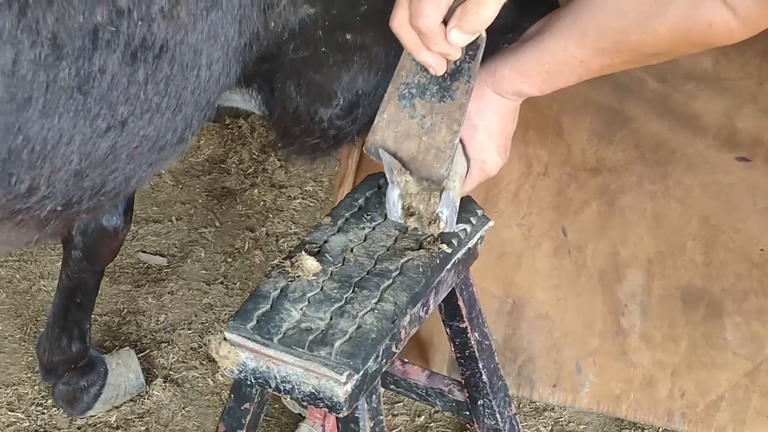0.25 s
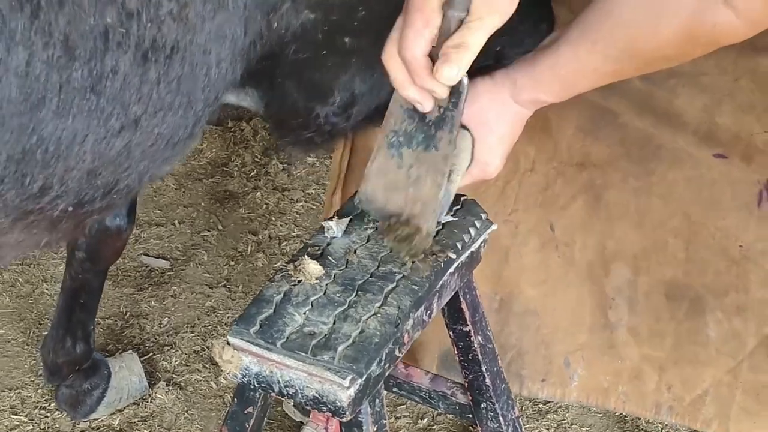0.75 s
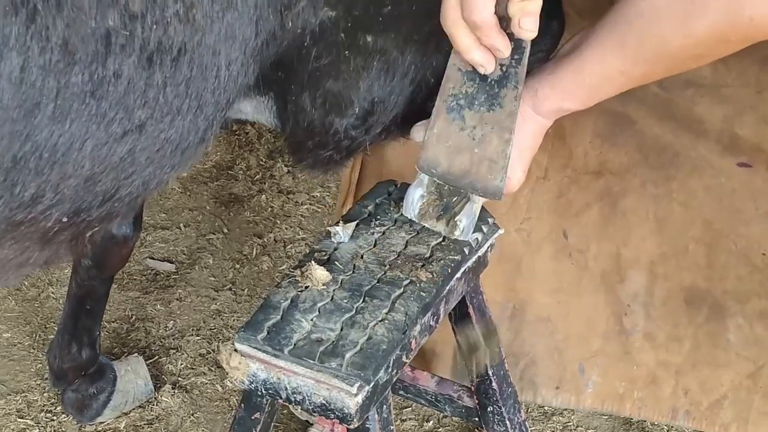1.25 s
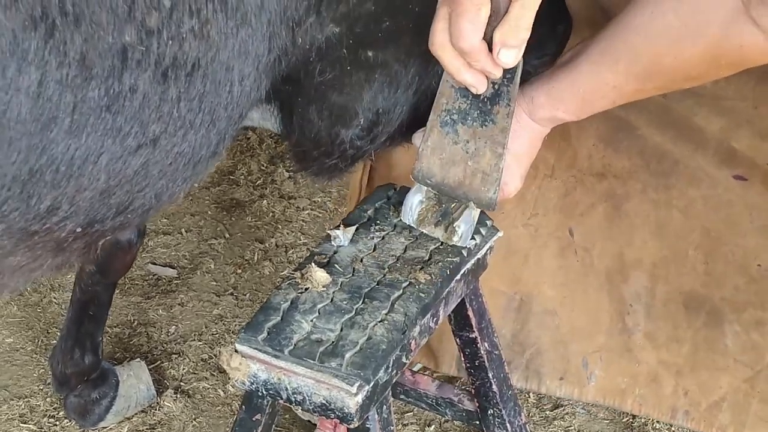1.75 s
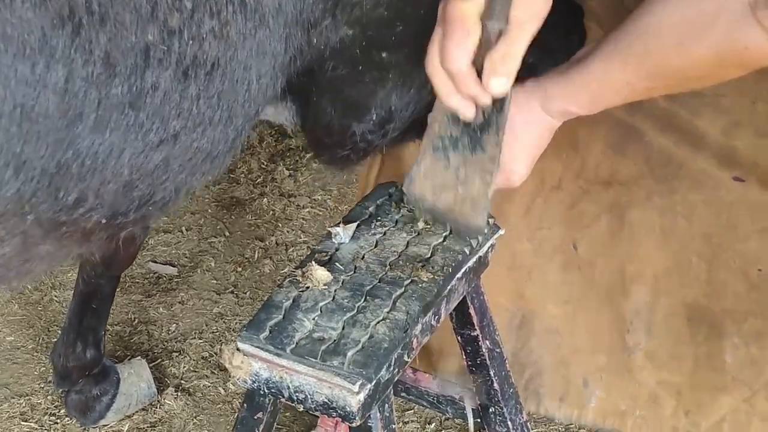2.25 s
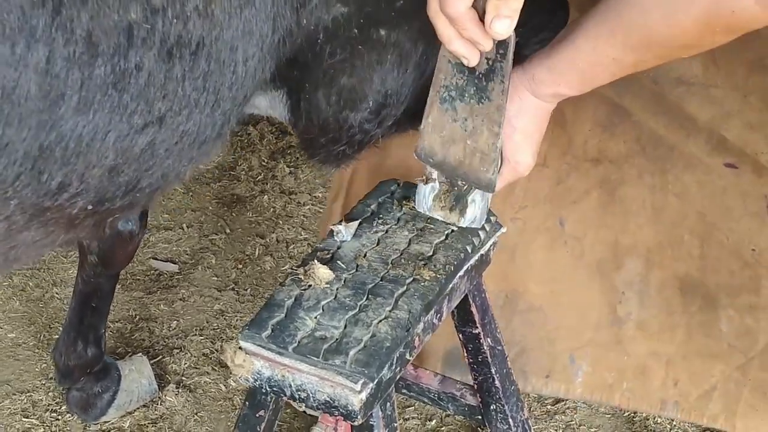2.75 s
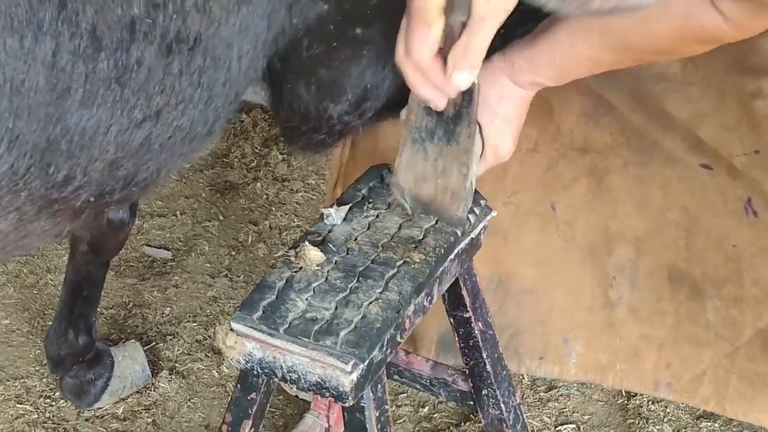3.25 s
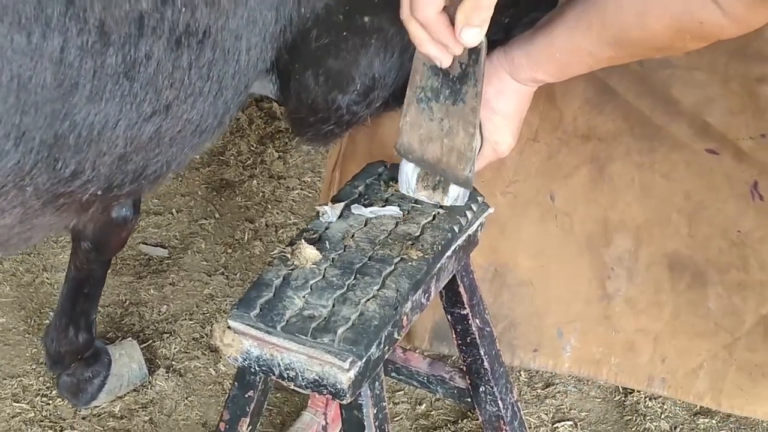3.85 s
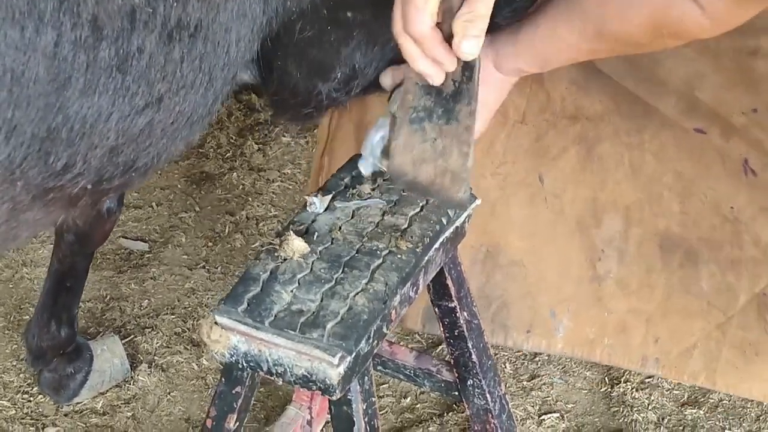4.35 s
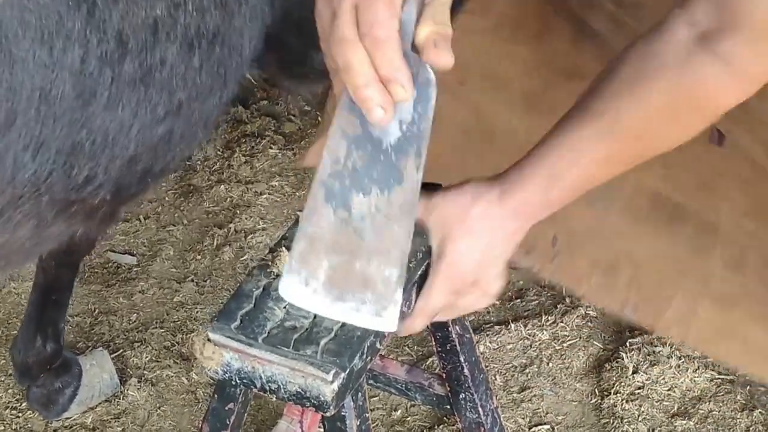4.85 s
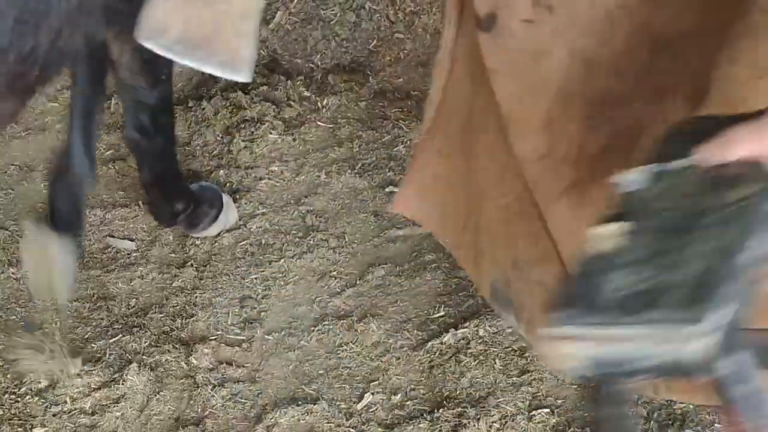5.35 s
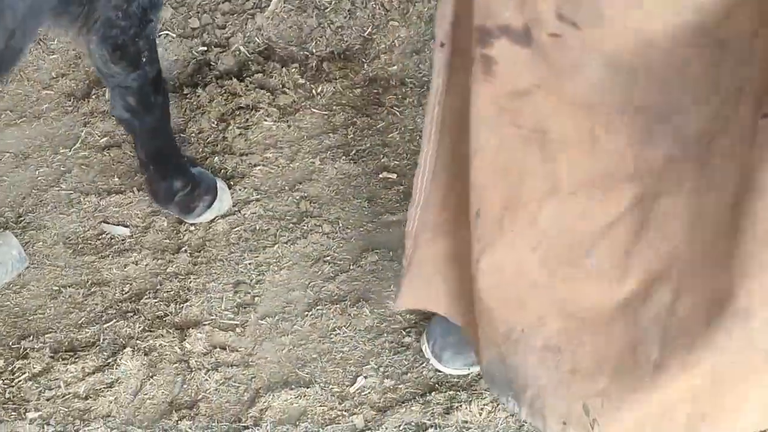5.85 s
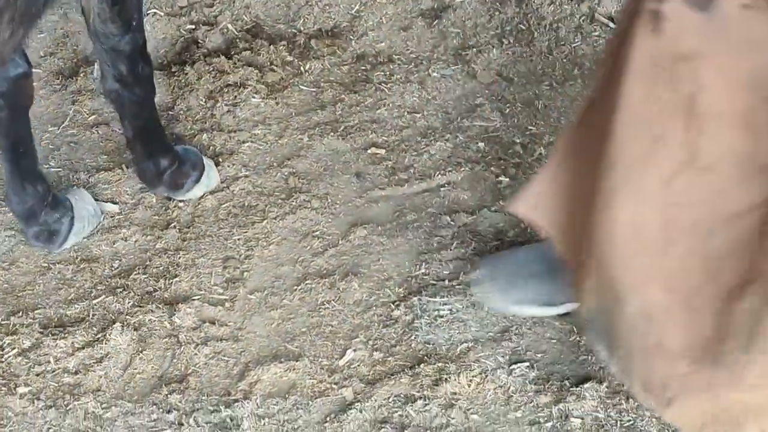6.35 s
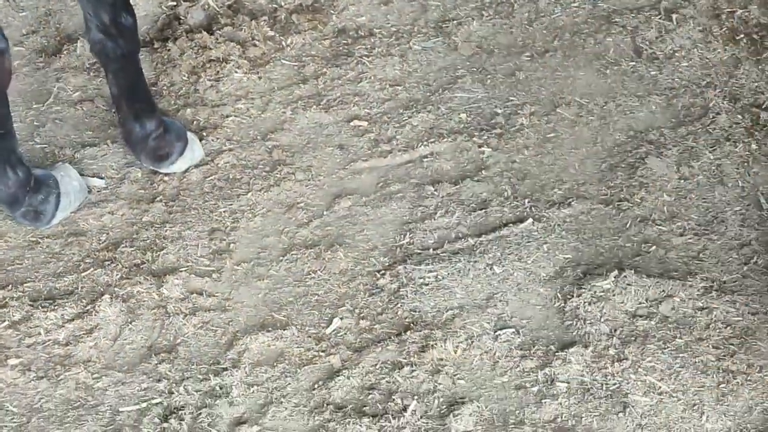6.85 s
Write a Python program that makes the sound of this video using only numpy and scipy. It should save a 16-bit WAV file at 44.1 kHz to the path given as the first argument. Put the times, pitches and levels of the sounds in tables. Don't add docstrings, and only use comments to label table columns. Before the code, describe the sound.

Two donkeys bray a few metres from a handheld phone outdoors. The tail of a deep haw gives way to soft hiss and dry paring strokes of steel on hoof. Snorty wheezes lead into strong hee-haw calls, the second hee much higher, overlapped by a low moan and a climbing snort before a long buzzing haw. Faint squeaks, wind thumps and a far motor hum lie beneath.

```python
import sys
import numpy as np
from scipy import signal
from scipy.fft import rfft, irfft, next_fast_len
from scipy.io import wavfile
from scipy.ndimage import uniform_filter1d, minimum_filter1d

SR = 44100
rng = np.random.default_rng(int(sys.argv[2]) if len(sys.argv) > 2 else 0)


def ratio_of_db(decibels):
    return 10 ** (np.asarray(decibels, float) / 20)


def unload_audio(sound):
    columns = np.transpose(np.atleast_2d(sound))
    steps = np.round(np.clip(columns, -1, 1) * 32767)
    wavfile.write(sys.argv[1], SR, steps.astype(np.int16))


N = 313572
TIME = np.arange(N) / SR


def unit(x):
    return x / np.sqrt(np.mean(x ** 2))


def curve(table):
    s, *columns = np.transpose(table)
    return [np.interp(TIME, s, c) for c in columns]


def on_log(hz, points):
    f, v = np.transpose(points)
    return np.interp(np.log(np.maximum(hz, 1)), np.log(np.maximum(f, 1)), v)


def shaped(gain_of_hz, x):
    size = next_fast_len(N)
    hz = np.fft.rfftfreq(size, 1 / SR) + 1e-3
    return irfft(rfft(x, size) * gain_of_hz(hz), size)[..., :N]


def resonances(modes):
    def gain(f):
        power = 0
        for hz, width_hz, db in modes:
            detune = (f - hz * hz / f) / (3.06 * width_hz)
            power = power + ratio_of_db(2 * db) / (1 + detune ** 2) ** 2
        return np.sqrt(power)
    return gain


def walk(rate, size=N):
    k = int(SR / rate)
    steps = np.repeat(rng.standard_normal(size // k + 1), k)
    return 1.87 * uniform_filter1d(uniform_filter1d(steps, k), k)[:size]


def pair(like):
    mid, side = rng.standard_normal((2, N))
    like = np.clip(like, 0, 1)
    return np.sqrt(1 + like) * mid + np.sqrt(1 - like) * side * np.array([[1], [-1]])


def panned(db):
    return ratio_of_db(np.array([[db], [-db]]) / 2)


def arrival(s, length, rise, fall_db_per_s):
    return np.clip((TIME - s) / rise, 0, 1) * ratio_of_db(-fall_db_per_s * np.clip(TIME - s - length, 0, None))


# f/Hz, level/dB per Hz
YARD = [(150, -3), (300, 0), (600, -9), (2200, -8), (2900, -17), (4000, -16.5), (5000, -10), (6200, -11.5),
        (7600, -10.5), (8600, -16.5), (9500, -31), (15000, -44)]


def yard_hiss():
    hiss = unit(shaped(lambda f: ratio_of_db(on_log(f, YARD)) * (f > 100), pair(0.33)))
    return hiss * ratio_of_db(-59.5 + 1.3 * walk(2))


# t/s, level/dB
MOTOR = [
    (0, -80.5),
    (3.5, -57.5),
    (5.9, -51),
    (6.2, -57.5),
    (7.11, -71.5),
]


def far_motor():
    motor_hz = 52
    level_db = curve(MOTOR)[0] + 1.0 * walk(5.2)
    return np.sqrt(2) * ratio_of_db(level_db) * np.sin(2 * np.pi * motor_hz * TIME)


# t/s, peak level/dB, length/s
GUSTS = [
    (0.018, -39, 0.22),
    (0.712, -43, 0.015),
    (1.067, -49, 0.06),
    (1.352, -48, 0.03),
    (1.885, -46.5, .25),
    (2.501, -29, 0.017),
    (2.571, -36, 0.11),
    (5.641, -46.5, 0.058),
    (7.024, -46, 0.087),
]


def wind():
    lull_db, rumble_db, rumble_growth, rumble_lull_db = -57, 1.5, 1.217, -63
    gust = sum(ratio_of_db(2 * db) * np.exp(-2 * np.abs(TIME - s) / length) for s, db, length in GUSTS)
    buffet_level_db = 10 * np.log10(gust + ratio_of_db(2 * lull_db))
    rumble_power = ratio_of_db(2 * rumble_db) * gust ** rumble_growth + ratio_of_db(2 * rumble_lull_db)
    rumble_level_db = 10 * np.log10(rumble_power)
    buffet = unit(shaped(resonances([(30.3, 17, 0)]), pair(0.23)))
    buffet = buffet * ratio_of_db(buffet_level_db + 2.0 * walk(9.3))
    rumble = unit(shaped(resonances([(64.7, 43, -1), (144, 360, -9.5)]), pair(0.71)))
    rumble = rumble * ratio_of_db(rumble_level_db + 3.5 * walk(40))
    rumble = shaped(lambda f: 1 / np.sqrt(1 + (f / 330) ** 5), rumble)
    return (buffet + rumble) * panned(-3.5)


def walls(x):
    near_t60_s, far_t60_s = .4, 1.3
    wall_db, far_wall_db = -8, -27
    fading = ratio_of_db(-60 * TIME / near_t60_s) + ratio_of_db(far_wall_db - 60 * TIME / far_t60_s)
    tail = rng.standard_normal((2, N)) * fading * (TIME > .012)
    tail = tail[:, :SR] / np.sqrt(np.sum(tail[0] ** 2))
    thin = shaped(lambda f: f / np.hypot(f, 500), x.mean(axis=0))
    return ratio_of_db(wall_db) * signal.fftconvolve(thin[None], tail, axes=1)[:, :N]


# t/s, f/Hz, peak level/dB, rise/s, fade/s
PINGS = [(.589, 1220, -34, .004, .005), (.589, 2150, -35, .003, .006), (3.22, 850, -21, .02, .03),
         (3.42, 850, -19, .04, .04), (0.764, 1175, -34.5, 0.0066, 0.014), (.775, 1250, -44, 0.011, 0.02),
         (0.769, 2350, -41, 0.015, 0.016), (.772, 3428, -47, 0.011, 0.008), (1.0, 5500, -53, 0.0054, 0.011),
         (1.7, 2250, -60, .03, .04), (1.555, 2260, -61, 0.0072, 0.0144), (1.765, 970, -57, 0.012, 0.013),
         (2.253, 5400, -56.5, 0.0015, .04), (2.252, 7540, -48, 0.0013, .02), (4.275, 4400, -55, .008, .012),
         (4.265, 5450, -58, .006, .012), (4.325, 5400, -58, .006, .01), (5.44, 5450, -58, .005, .01),
         (4.08, 960, -20, .03, 0.04), (5.585, 3780, -49, .035, 0.056), (7.04, 3690, -51, 0.058, 0.05)]


def pings():
    glide_per_s = .4
    out, flutter = np.zeros(N), ratio_of_db(3.5 * walk(140))
    for s, hz, db, rise, fade in PINGS:
        into = np.clip(TIME - s, 0, .3)
        shape = np.clip(into / rise, 0, 1) * np.exp(-np.clip(into - rise, 0, None) / fade)
        shape = shape * (into < .3)
        climb = 1 + glide_per_s * rise * into / 0.12
        out += ratio_of_db(db) * shape * np.sin(2 * np.pi * hz * into * climb)
    return out * flutter * panned(-0.45)


# f/Hz, level/dB per Hz
BLADE = [(600, -13), (1200, -7.5), (2200, -2), (2900, -16.5), (4000, -22), (5000, -14.5), (6200, -18.5),
         (7600, -16.5), (8600, -19), (9500, -30), (12000, -22), (15000, -21)]
# t/s, length/s, level/dB, brightness/dB, left minus right/dB
SCRAPES = [(-.02, .19, -43.5, 4.5, -1), (0.021, 0.092, -46.5, 4.5, -1.5), (0.575, 0.004, -44.5, -1.5, 5),
           (0.59, 0.014, -39.5, -8.5, -0.5), (0.62, 0.004, -49.5, 7, -11), (0.628, 0.012, -48.5, -8, -0.5),
           (1.303, .05, -62.5, -10, -1), (1.718, .06, -61, -9, 0), (1.876, 0.086, -50.5, 4, -7),
           (1.984, 0.02, -48.5, 3, -13.5), (2.423, .03, -50.5, 1, -8), (4.043, 0.063, -53, 4, -5.5),
           (4.102, 0.008, -32, 0.5, -5.5), (4.243, 0.056, -50, -2.5, -8), (5.384, 0.03, -63, 8, -2.5)]


def scrapes():
    grit, bright_hz = 0.28, 3300
    hiss = unit(shaped(lambda f: ratio_of_db(on_log(f, BLADE)) * (f > 500), pair(0.28)))
    bright = shaped(lambda f: f > bright_hz, hiss)
    grain = 1 - grit + grit * rng.exponential(size=N // 64 + 1).repeat(64)[:N]
    out = np.zeros((2, N))
    for s, length, db, bright_db, pan_db in SCRAPES:
        into = TIME - s
        fade = np.exp(-np.clip(into - length, 0, None) / (0.0045 + .12 * length))
        stroke = np.clip(into / (0.11 * length), 0, 1) * fade
        out += ratio_of_db(db) * panned(pan_db) * stroke * grain * (hiss + (ratio_of_db(bright_db) - 1) * bright)
    return out


# t/s, length/s, level/dB, from f/Hz, to f/Hz, width/Hz
SNORT = (5.53, .28, -38, 2250, 2650, 1000)


def snort():
    s, length, db, from_hz, to_hz, width_hz = SNORT
    hz = np.interp(TIME, [s, s + length], [from_hz, to_hz])
    air = np.array([walk(width_hz), walk(width_hz)]) * np.sin(2 * np.pi * np.cumsum(hz) / SR)
    return ratio_of_db(db) * air * arrival(s, length, length / 2, fall_db_per_s=297)


# f/Hz, width/Hz, level/dB
SNORE_TRACT = [(376, 25.6, -4.5), (850, 37, 1), (1120, 26, 0), (1640, 16, -15), (2150, 120, -27.5),
               (3194, 40, -31.5), (710, 210, -15)]
# t/s, length/s, level/dB
SNORES = [
    (1.822, 0.15, -36.5),
    (2.069, .03, -44.5),
    (2.147, 0.05, -41),
    (2.224, 0.056, -41.5),
    (2.339, 0.036, -38),
    (2.371, 0.036, -32.5),
    (2.41, 0.041, -32),
    (2.487, 0.12, -35.5),
    (2.597, 0.032, -35.5),
    (2.66, 0.13, -31.5),
]


def snores():
    air = unit(shaped(resonances(SNORE_TRACT), ratio_of_db(2.8 * walk(60)) * pair(0.95)))
    power = sum(ratio_of_db(2 * db) * arrival(s, length, .003, 501) ** 2 for s, length, db in SNORES)
    return air * np.sqrt(power)


# f/Hz, width/Hz, level/dB
CHEST = [(385, 70, 0), (480, 300, -14)]
THROAT = [(862, 73, 0), (1103, 92, -4.5), (845, 420, -9)]
MOUTH = [(1635, 35, 2), (1780, 5500, -6.5)]
NOSTRIL = [(3200, 290, 1), (4980, 750, -5.5), (7570, 260, 3), (10500, 710, -17.5)]


def breath_jets(sung):
    jet = np.abs(shaped(lambda f: f > 900, sung)) * pair(0.23)
    return ratio_of_db(-30.0) * shaped(resonances(NOSTRIL), jet)


# lowest f/Hz, highest f/Hz
MUZZLE_HZ = (162, 2222)
# t/s, length/s, effort level/dB, chest depth/dB, mouth opening/dB
TURNS = [(-.03, 0.19, -21.5, -5.5, -8.5), (0.179, 0.13, -29.5, -10.5, -10.5), (1.818, .15, -50.5, -15, -12),
         (2.366, 0.4, -45.5, -1.5, -15), (2.735, 0.04, -32.5, 4, -13), (3.17, 0.043, -29, -8.5, -6.5),
         (3.207, 0.079, -21.5, -10.5, -10.5), (3.434, 0.088, -27.5, -5.5, -5),
         (3.543, 0.18, -27, -11, -5.5), (4.11, 0.36, -48, 3.5, -7.5), (5.513, 0.086, -42, -4, -1),
         (5.585, 0.1, -29, -15.5, -3), (5.684, 0.13, -26.5, -16.5, -8.5),
         (5.751, 0.064, -22.5, -0.5, -17.5), (5.831, .08, -38.5, -2, -1.5), (5.917, 0.1, -33, 0, 2),
         (5.986, 0.079, -14.5, -9.5, -15.5), (6.951, 0.07, -25.5, -28, -5.5), (7.071, .1, -34.5, -15, 1.5)]


def rasp(sung):
    rise_s, fall_db_per_s = 0.024, 297
    nostril_db, nostril_opening = -23.5, 0.052
    leak_db = (-35.5, -23, -25, -43)
    leak_growth, smooth = 0.74, int(0.047 * SR)
    pulsing, pulse_top_hz = .6, 450
    flap_db, out = 0.88 * walk(130), 0
    tone = shaped(lambda f: f < pulse_top_hz, sung[0])
    tone_size = np.sqrt(2 * np.abs(uniform_filter1d(tone ** 2, smooth)) + 1e-5)
    puffs = 1 + pulsing * tone / tone_size
    voice = np.abs(uniform_filter1d(shaped(lambda f: f > 800, sung[0]) ** 2, smooth)) ** leak_growth
    power = ratio_of_db(2 * np.array(leak_db))[:, None] * voice
    for s, length, db, depth_db, open_db in TURNS:
        share_db = db + np.array([depth_db, 0, open_db, nostril_db + nostril_opening * open_db])
        power = power + ratio_of_db(2 * share_db)[:, None] * arrival(s, length, rise_s, fall_db_per_s) ** 2
    low_hz, high_hz = MUZZLE_HZ
    muzzle = lambda f: 1 / np.sqrt((1 + (low_hz / f) ** 8) * (1 + (f / high_hz) ** 16))
    for modes, p, like in zip((CHEST, THROAT, MOUTH, NOSTRIL), power, (0.99, 0.62, 0.14, 0.19)):
        air = shaped(resonances(modes), ratio_of_db(flap_db + 1.5 * walk(40)) * pair(like))
        if modes is not NOSTRIL:
            air = shaped(muzzle, air)
        out = out + unit(air) * np.sqrt(p) * (1 if modes is CHEST else puffs)
    return out


# from t/s, to t/s, cycles per beat, depth/0-1
GROWLS = [
    (0, 0.28, 3, 0.18),
    (2.719, 2.795, 2, 0.43),
    (3.184, 3.308, 2, 0.18),
    (3.389, 3.496, 2, 0.1),
    (3.558, 3.764, 3, 0.19),
    (6.45, 6.9, 2, .05),
    (4.723, 5.422, 2, 0.02),
    (5.708, 5.844, 2, 0.3),
    (6.03, 6.23, 2, 0.1),
    (6.985, 7.108, 2, 0.2),
]


def growl(phase, span):
    gain = np.ones_like(phase)
    for start, end, cycles, depth in GROWLS:
        inside = np.clip(np.minimum(TIME[span] - start, end - TIME[span]) / 0.023, 0, 1)
        beat = np.exp(1.45 * np.cos(phase / round(cycles))) / 2.46
        gain *= 1 + depth * inside * (beat - 1)
    return gain


# t/s, loss level/dB, half length/s
CATCHES = [
    (2.212, 16.5, .015),
    (2.359, 9, .012),
    (2.413, 10, .012),
    (4.739, 8.5, .014),
    (4.782, 4, .012),
    (4.83, 2.5, .015),
    (4.873, 6, .02),
    (4.94, 4, .012),
    (5.352, 2.5, .04),
    (7.052, 16.5, 0.011),
]


def catch_db(span):
    return sum(db * np.clip(1 - np.abs(TIME[span] - s) / half, 0, 1) for s, db, half in CATCHES)


# from t/s, to t/s, f/Hz, width/Hz, level/dB
TONGUE = [(6.04, 6.26, 1600, 110, 13), (5.99, 6.22, 2100, 130, -17), (6.0, 6.24, 1050, 160, -9.5),
          (5.95, 6.33, 750, 76, -11), (5.99, 6.24, 5100, 770, -16.5), (6.0, 6.24, 3200, 570, -6.5),
          (6.25, 6.8, 5030, 430, -10.5), (5.9, 6.04, 1180, 150, -8), (8, 6.95, 4700, 120, 6),
          (6.42, 6.84, 3360, 79.7, 3), (6.3, 6.8, 1540, 60, -4), (6.845, 6.865, 1850, 100, -10),
          (6.85, 7.0, 810, 60, 6), (6.04, 6.3, 600, 25, 7), (6.5, 7, 5900, 600, -15),
          (4.79, 4.83, 1100, 100, -14), (4.88, 4.91, 1400, 500, -14), (4.94, 5.04, 1150, 100, -9),
          (5.145, 5.19, 1150, 100, -15), (5.25, 5.29, 1150, 100, -9), (5.3, 5.35, 1150, 100, 5.5),
          (4.92, 5.06, 1720, 100, 3.5), (5.18, 5.3, 1720, 100, 5.5), (5.42, 5.52, 1900, 640, -16.5),
          (4.7, 5.19, 5100, 250, -4), (0.28, 0.39, 860, 80, 8.5), (2.7, 2.78, 1800, 650, -11),
          (3.04, 3.25, 710, 60, -12), (3.13, 3.25, 1900, 160, -9), (3.27, 3.42, 1700, 190, 4.5),
          (3.44, 3.52, 1700, 360, -8), (3.5, 3.42, 5600, 440, 0.5), (3.55, 3.75, 1300, 600, 4.5),
          (4.48, 4.66, 1020, 100, 6.5), (3.7, 5, 2200, 200, 7), (5.4, 5.5, 1200, 74, 10.5),
          (3.2, 3.95, 3600, 170, 5)]


def tongue_db(hz, span):
    glide_s = 0.042
    t, total = TIME[span], 0
    for start, end, centre_hz, width_hz, db in TONGUE:
        in_time = start < t[-1] and end > t[0]
        in_reach = hz.min() - 3 * width_hz < centre_hz < hz.max() + 3 * width_hz
        if in_time and in_reach:
            inside = np.clip(np.minimum(t - start, end - t) / glide_s + .5, 0, 1)
            total = total + db * inside * np.exp(-((hz - centre_hz) / width_hz) ** 2)
    return total


def halo(hz):
    per_khz, rate = .1, 170
    flutter = np.array([walk(rate, size=len(hz)) for _ in range(2)])
    return 1 + per_khz * hz.mean() / 1000 * flutter


def scatter(hz):
    scatter_rad, full_hz = .45, 1300
    return scatter_rad * min(hz.mean() / full_hz, 1) ** 2 * rng.uniform(-1.2, 1, (2, 1))


def note(table, partials_db, sinuses, left_lag_ms, sinus_db, unsteady):
    upper_top_hz, upper_lag = 6325, .6
    pan_db, pan_db_per_ms = -1.36, 5.5
    start, end = table[0][0], table[-1][0]
    span = slice(int(start * SR), min(int(end * SR), N))
    hz, effort_db, open_db = (c[span] for c in curve(table))
    size = len(hz)
    caught_db = catch_db(span)
    wobble = unsteady * (0.69 * walk(120, size=size) + 2 * walk(30, size=size))
    phase = 2 * np.pi * np.cumsum(hz) / SR + wobble
    lag = np.pi * hz * left_lag_ms / 1000 * np.array([[-1], [1]])
    phase, upper_phase = phase + lag, phase + upper_lag * lag
    since_start = TIME[span] - start + .02 * (span.start == 0)
    edge = np.clip(np.minimum(since_start, end - TIME[span]) / 0.015, 0, 1)
    chest, mouth = partials_db
    mouth_ref = 10 * np.log10(np.sum(ratio_of_db(2 * np.array(mouth))))
    out = np.zeros((2, N))
    for k, db in enumerate(chest + mouth, 1):
        if k <= len(chest):
            waver, group_db, blur = 5 * unsteady, -caught_db - max(chest), 1
        else:
            waver, group_db, blur = min(1.2 + 30 * unsteady, 4), open_db - mouth_ref, halo(k * hz)
        level_db = db + effort_db + group_db + waver * walk(24, size=size) + tongue_db(k * hz, span)
        swing = np.sin(k * phase + rng.uniform(0, 2 * np.pi) + scatter(k * hz))
        out[:, span] += np.sqrt(2) * blur * ratio_of_db(level_db) * swing
    for k in range(len(chest + mouth) + 1, int(upper_top_hz / hz.max()) + 1):
        ring_db = sinus_db + effort_db + open_db + 1.8 * walk(21.85, size=size) + tongue_db(k * hz, span)
        swing = np.sin(k * upper_phase + k * k + scatter(k * hz))
        out[:, span] += ratio_of_db(ring_db) * resonances(sinuses)(k * hz) * halo(k * hz) * swing
    out[:, span] *= edge * growl(phase, span)
    return out * panned(pan_db + pan_db_per_ms * left_lag_ms)


# t/s, fold rate f/Hz, effort level/dB, mouth opening/dB
HAW_1 = [(0.0, 177.8, -27.5, -7), (0.04, 179.3, -10, -29), (0.1, 179.8, -18, -5.5),
         (0.224, 177.8, -11, -16.5), (0.264, 176.3, -12, -13.5), (0.374, 171.5, -27.5, 4),
         (0.494, 174.3, -21.5, -10.5), (0.59, 168.2, -46.5, -8)]
HEE_1 = [(2.71, 379, -25.5, -5), (2.78, 357.4, -30.5, -3), (2.839, 350.6, -14.5, -15),
         (2.94, 345.3, -25.5, -3.5), (3.06, 352.2, -12, -17), (3.178, 358.1, -6.5, -17),
         (3.213, 364.7, -22, -6), (3.25, 399.3, -13, -19.5), (3.27, 391, -44.5, 25)]
HAW_2 = [(3.203, 234.6, -39.5, 15), (3.238, 244.2, -31, 7.5), (3.298, 249.2, -23, 13.8),
         (3.387, 249.8, -29.5, 13.8), (3.422, 242.5, -26.5, 11), (3.517, 241, -42, 19.5)]
HAW_3 = [(3.432, 187, -21, 0), (3.462, 189.4, -20, -1.5), (3.487, 178.7, -16, -17.5),
         (3.537, 179.8, -10.5, -14), (3.735, 176.3, -12.5, -14.5), (3.775, 168.6, -24, 0.2),
         (4.051, 163.8, -21, -9.5), (4.12, 160.9, -28.5, -0.5), (4.215, 160.6, -39, -13.5)]
HEE_2_START = [(4.435, 491, -47.5, -5), (4.475, 480.3, -31, -8.5), (4.554, 488, -26.5, -8.5),
               (4.58, 514.7, -28, -1.5), (4.6, 528.4, -25, -10), (4.62, 534, -29.5, -13),
               (4.645, 533.7, -18, -11.5), (4.665, 530, -20.5, -14), (4.695, 518, -39, -0.5)]
HEE_2 = [(4.682, 518, -38, 1.5), (4.718, 524, -22.5, -4), (4.765, 539.3, -16.5, -13.5),
         (4.86, 559, -13.5, -12), (4.9, 559, -12.5, -11.5), (4.964, 574.4, -10.5, -16),
         (5.308, 575.7, -14, -12.5), (5.44, 587.6, -15.5, -21.5), (5.51, 594.4, -41, 0.5)]
HEE_3 = [(5.682, 338.7, -43, 11), (5.712, 334.8, -26.5, -2.5), (5.752, 371.7, -26, -1.5),
         (5.827, 359.8, -29.5, 3.5), (5.882, 365.6, -16, -5.5), (5.922, 377.4, -23.5, -2.5),
         (5.996, 400, -15, 3.5), (6.036, 402, -42, -1.5)]
HAW_4 = [(6.016, 253.8, -16, 8), (6.131, 267.7, -26, 11), (6.3, 257.3, -21, 6), (6.375, 253.3, -22, 7),
         (6.52, 259.1, -18, 6), (6.79, 257.9, -18.5, 6), (6.97, 273, -21, 4), (7.024, 254.7, -21.5, -14.5),
         (7.109, 250.7, -56.5, -0.5)]
# t/s, fold rate (CROAK: line) f/Hz, effort level/dB, mouth opening/dB
MOAN = [(5.38, 122.2, -41.5, 4.5), (5.542, 118, -33.5, 3), (5.772, 117, -34.5, 2), (5.817, 117.4, -38.5, 9),
        (5.966, 119, -34.5, -16)]
MOAN_END = [(5.932, 116.9, -38, -19.5), (5.956, 120.1, -37.5, 15), (6.061, 119.7, -24.5, -1.5),
            (6.316, 125.9, -39.5, 18.5)]
SIGH = [(6.12, 236, -36.5, -27), (6.3, 127.5, -50, -23.5)]
WHEEZE_1 = [(1.801, 771.5, -66, -25.5), (1.826, 796.7, -34, -15), (1.871, 856, -37, -15.5),
            (1.93, 829.5, -40, -23), (1.98, 839, -41.5, -26.5), (2.02, 850, -33.5, -33),
            (2.05, 792, -39.5, -21.5), (2.075, 763, -45, -17.5), (2.09, 792, -47.5, -28.5)]
WHEEZE_1_END = [(2.07, 809, -50.5, -26.5), (2.11, 850, -36.5, -29.5), (2.135, 820, -40, -25.5),
                (2.16, 775, -40.5, -25), (2.185, 834, -43, -23.5), (2.23, 819, -45, -28),
                (2.27, 867, -43.5, -31), (2.305, 865, -61.5, -18)]
WHEEZE_2 = [(2.315, 860, -53, -33.5), (2.34, 864, -31, -39), (2.39, 855, -33.5, -27),
            (2.639, 860, -38, -28.5), (2.679, 857, -30, -32), (2.799, 842.5, -27, -22)]
GASP = [(4.3, 437, -30, -18.5), (4.345, 429, -45.5, 8.5), (4.375, 447, -41, -28), (4.42, 484.5, -60.5, 5.5),
        (4.45, 464, -45.5, -4.5)]
CROAK = [(5.7, 871.5, -38.5, -17.5), (5.73, 906, -25.5, -21), (5.765, 929.5, -21.5, -22.5),
         (5.8, 959, -20, -21.5), (5.825, 961, -24, -18), (5.845, 970, -45, -21)]
# chest group level/dB, then mouth group level/dB
WHEEZY = [0], [-20]
LOW_HAW = [-29.5, 0.038], [-8.5, -3.5, 1, -3, -9, -7, -23, -11.5, -12, -17.5, -23.5]
LOW_HEE = [0], [-2, 3, 0.5, -0.5, -10.5, -23]
SHORT_HAW = [-10.5], [-4, -8, 0, -1, -4, -5, -7.5]
HIGH_HEE = [0], [-17, -19.5, -32.5]
MOANED = [-34.5, 1.5, -44, -11], [-4.5, 0.5]
RISING_HEE = [0], [-16.5, 4.5, 0, -2.5, -33.5]
LONG_HAW = [-12, -5, -14.5], [-2, -3, -9, 1.5, -8]
# f/Hz, width/Hz, level/dB
NEAR_SINUS = [(2480, 80, 2), (3200, 80, 0), (3900, 300, -14), (5500, 250, -9), (4700, 80, -8)]
FAR_SINUS = [(3187, 65, 0), (3660, 78, -6), (4720, 88, 4.5), (4350, 250, -11), (2500, 130, -10),
             (5500, 300, -19)]
HEE_SINUS = [(3360, 100, -6), (5150, 100, 2.5), (2900, 150, -5)]
# note, partials, sinuses, left's lag/ms, sinus ring level/dB, fold unsteadiness/rad
VOICES = [(WHEEZE_1, WHEEZY, NEAR_SINUS, 0, -30.5, .45), (HAW_1, LOW_HAW, NEAR_SINUS, 0, -36.5, 0.025),
          (HEE_1, LOW_HEE, NEAR_SINUS, 0.1, -30.5, 0.021), (HAW_2, SHORT_HAW, NEAR_SINUS, 0.08, -29, 0.03),
          (HAW_3, LOW_HAW, NEAR_SINUS, 0.12, -34.5, 0.017), (HEE_2, HIGH_HEE, HEE_SINUS, -.17, -32, 0.08),
          (HEE_2_START, HIGH_HEE, HEE_SINUS, -0.22, -40.5, 0.1),
          (MOAN, MOANED, FAR_SINUS, -.048, -43, .035), (MOAN_END, MOANED, FAR_SINUS, -0.047, -39, 0.037),
          (HEE_3, RISING_HEE, NEAR_SINUS, .15, -35, 0.09),
          (HAW_4, LONG_HAW, FAR_SINUS, 0.077, -29.5, 0.013), (WHEEZE_2, WHEEZY, NEAR_SINUS, 0, -29.5, .45),
          (GASP, HIGH_HEE, HEE_SINUS, -.49, -43, 0.1), (SIGH, WHEEZY, FAR_SINUS, 0, -49.5, 0.091),
          (WHEEZE_1_END, WHEEZY, NEAR_SINUS, 0, -33, .45), (CROAK, WHEEZY, NEAR_SINUS, 0, -40, .4)]


def sung_notes():
    return shaped(lambda f: 1 / np.sqrt(1 + (120 / f) ** 12), sum(note(*row) for row in VOICES))


def scene():
    background = wind() + far_motor() + yard_hiss()
    sung = sung_notes()
    donkeys = sung + rasp(sung) + snort() + snores() + breath_jets(sung)
    treble_loss = lambda f: 1 / np.sqrt(1 + (f / 9000) ** 10)
    return shaped(treble_loss, donkeys + walls(donkeys)) + scrapes() + pings() + background


# f/Hz, level/dB
LEFT_PORT = [(1200, 0), (2200, 4.5), (4000, 4.5), (5000, 3.5), (6200, -1), (7600, -21), (8600, -16),
             (9500, -11), (12000, -1), (15000, 4)]


def low_pass(x):
    return signal.sosfilt(signal.butter(12, 15000, fs=SR, output="sos"), x)


def record(dry):
    limit = .85
    ports = np.array([shaped(lambda f: ratio_of_db(on_log(f, LEFT_PORT)), dry[0]), dry[1]])
    room = np.minimum(1, limit / (np.abs(ports).max(axis=0) + 1e-9))
    gain = uniform_filter1d(minimum_filter1d(room, size=882), size=441)
    return low_pass(ports * gain)


dry = scene()
out = record(dry)
unload_audio(out)
```